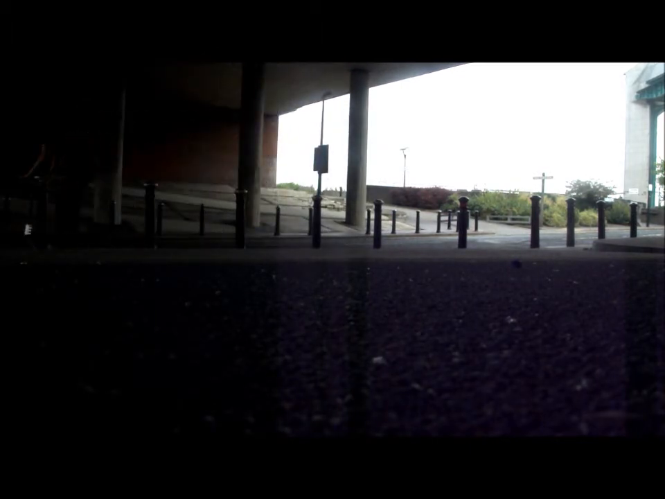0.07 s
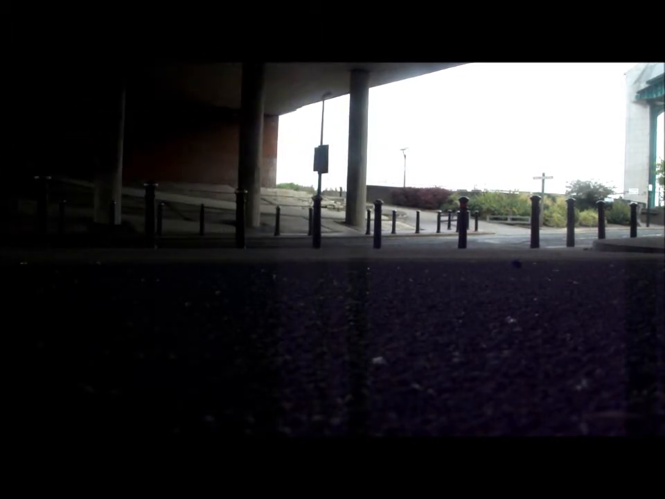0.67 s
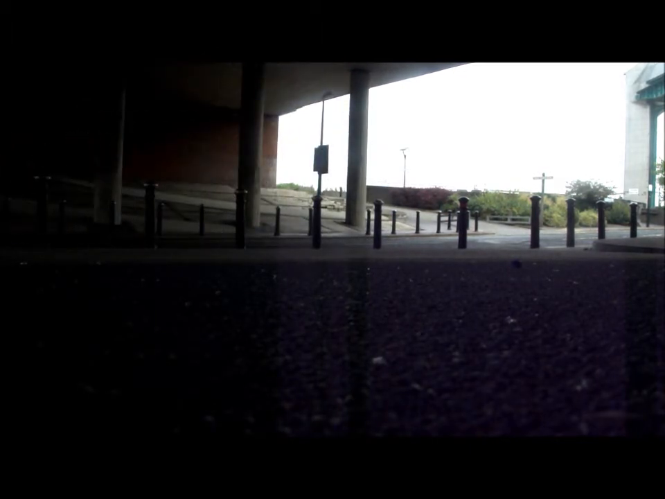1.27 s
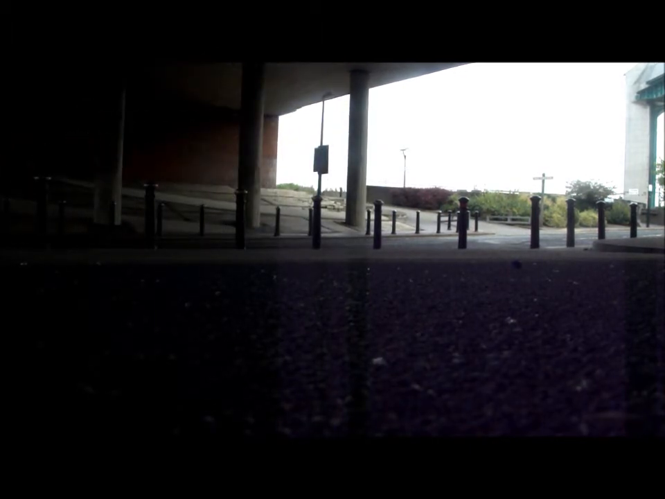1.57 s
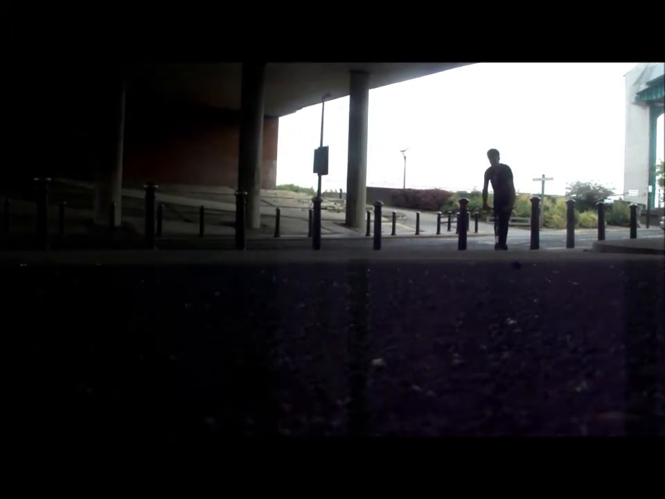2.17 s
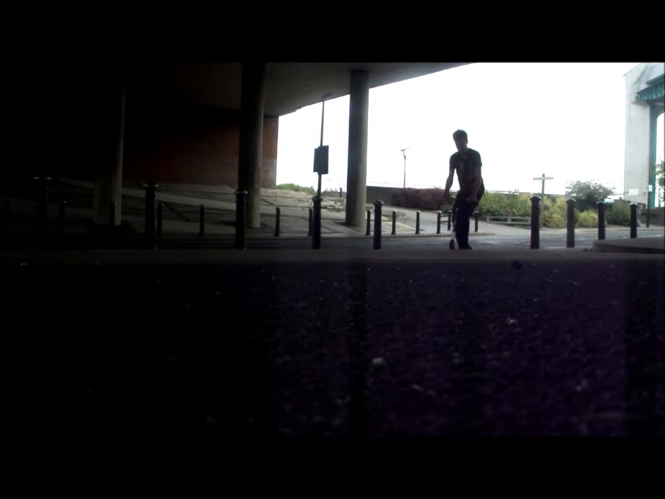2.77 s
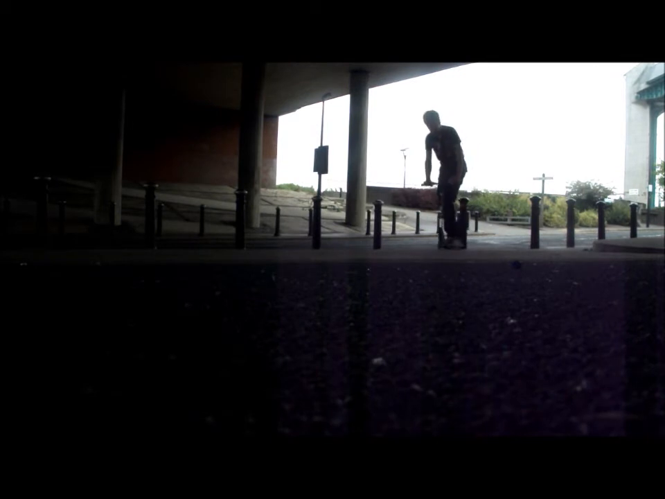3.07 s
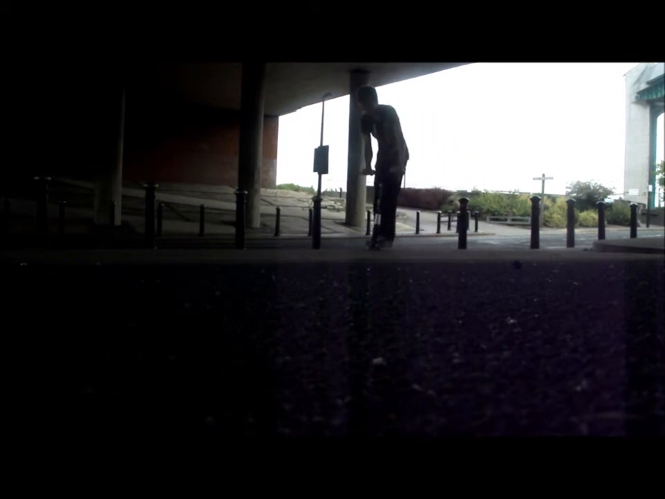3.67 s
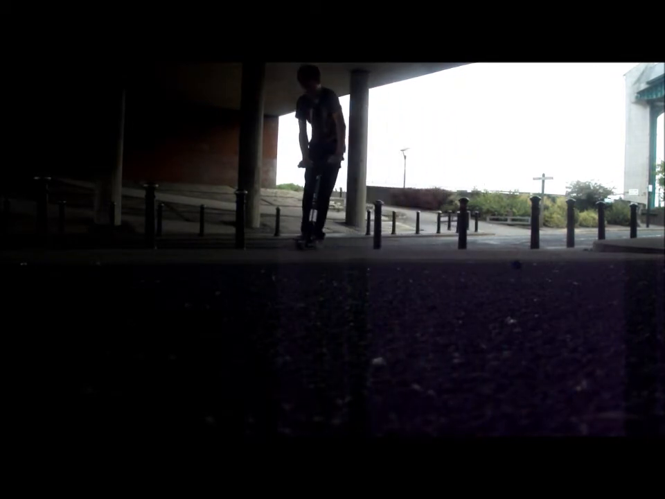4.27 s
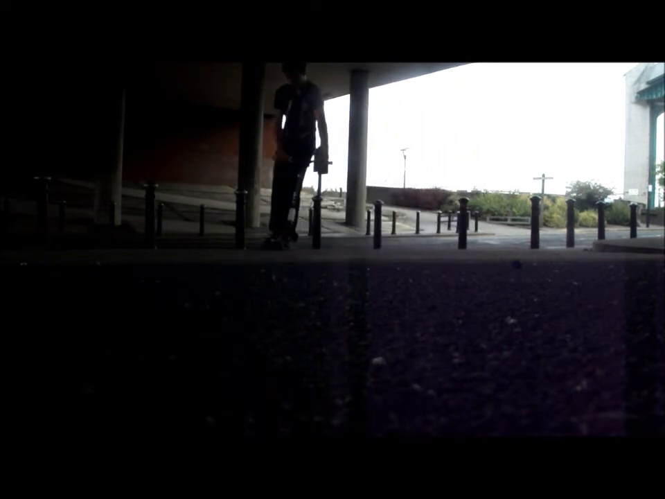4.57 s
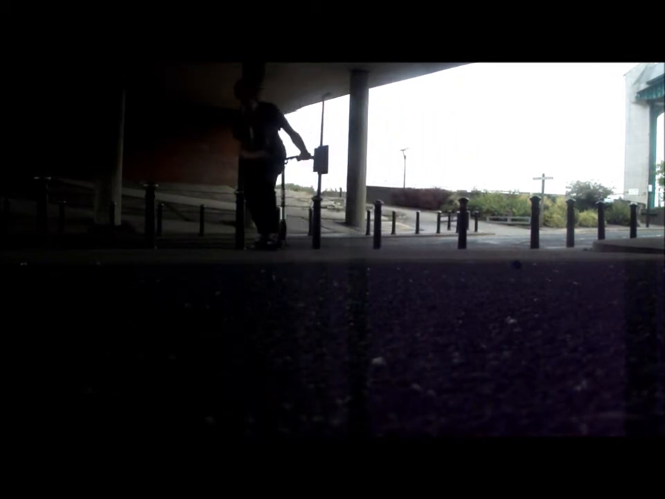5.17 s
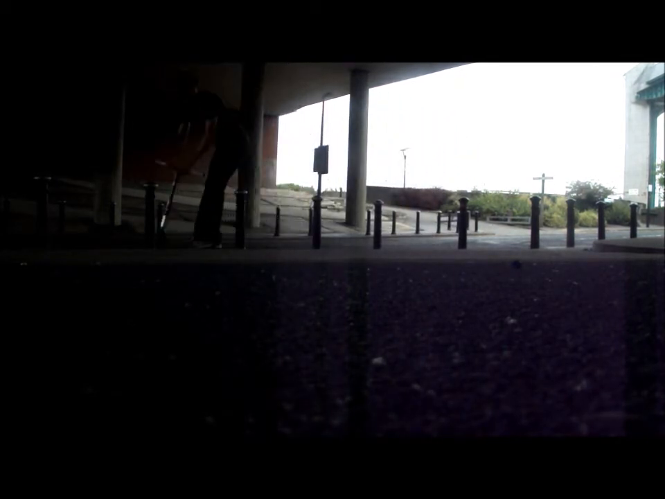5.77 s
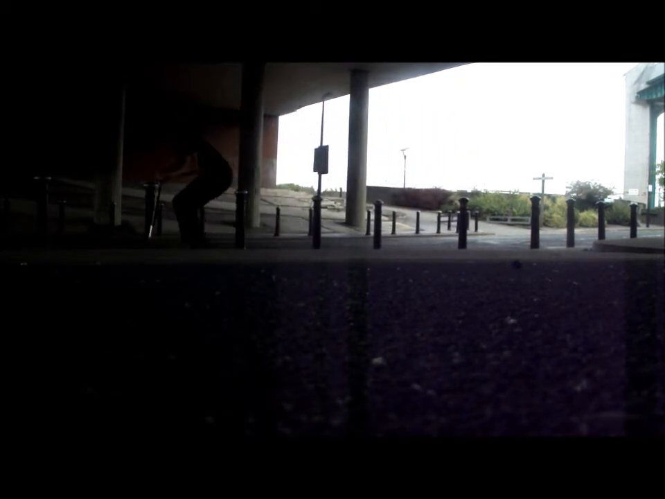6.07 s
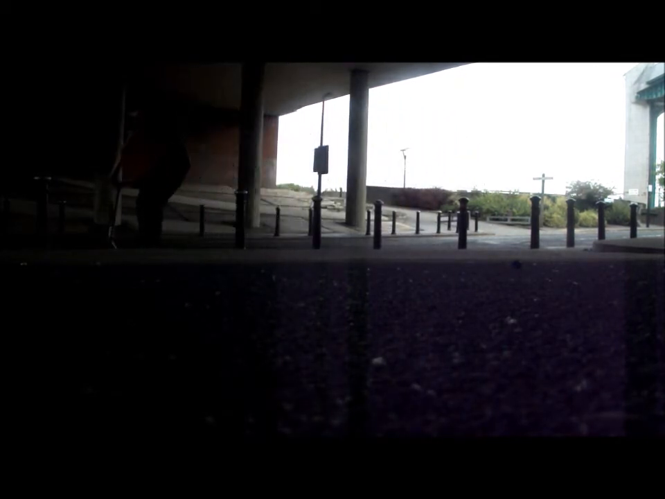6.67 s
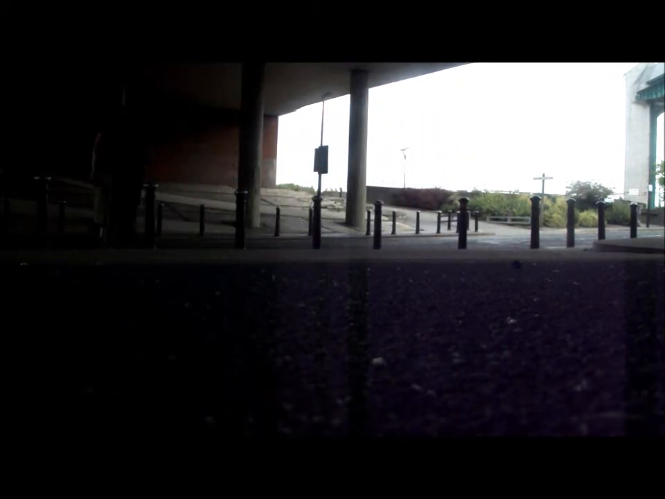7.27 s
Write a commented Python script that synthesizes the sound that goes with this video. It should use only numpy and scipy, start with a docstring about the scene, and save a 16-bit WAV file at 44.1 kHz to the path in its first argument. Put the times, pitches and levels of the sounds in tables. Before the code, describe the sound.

Under a concrete flyover, traffic rumbles steadily overhead. A stunt scooter knocks on the road a few times, its loose parts rattling and each hit echoing. After a sharp, ringing metal landing, its hard wheels roll over gritty asphalt past a microphone on the ground. The sound cuts out briefly, then returns on the hollow tail of another landing and quieter rolling.

```python
"""Traffic rumbles on a concrete flyover, and a stunt scooter knocks on the road underneath.
Its landings ring the metal frame and bounce between road and ceiling. Loose parts rattle,
and the hard wheels drum on the asphalt, skid and flick grit as they pass a small camera on the ground.
The microphone favours some pitches, the recorder whines faintly, and there is a faint hiss.
The sound cuts out twice: one tiny break, then a longer silence."""
import sys
import numpy as np
from scipy import signal
from scipy.fft import rfft, irfft
from scipy.io import wavfile
from scipy.ndimage import uniform_filter1d, minimum_filter1d

SR = 44100
rng = np.random.default_rng(int(sys.argv[2]) if len(sys.argv) > 2 else 0)


def inscribe(sig):
    """Save sig as 16-bit PCM at rate SR to the path in sys.argv[1].

    A 1-D sig is mono; a 2-D sig holds one channel per row.
    Samples are clipped to [-1, 1] before scaling.
    """
    pcm = np.round(np.clip(np.atleast_2d(sig).T, -1, 1) * 32767)
    wavfile.write(sys.argv[1], SR, pcm.astype(np.int16))


N = 331279
T = np.arange(N) / SR

# Levels in the tables are relative: the functions set how loud each layer ends up.
# wheels and deck (the footboard) hitting the road; ring and echo are added to the level:
# (time [s], level [dB], metal ring [dB], hollow note [Hz], ceiling echo [dB])
ROAD_HITS = [(.448, -2, -25, 360, 2), (.457, -1.5, -25.5, 400, -6.5), (.462, 0.5, -28, 370, -23),
             (1.111, 6, -10.5, 500, 0), (1.124, -2.5, -12.5, 500, -10.5), (2.784, -13, -1, 300, -7),
             (3.019, -6, 9, 320, -13), (3.033, -5, 5, 320, -2), (3.056, -9.5, -1, 320, -15.5),
             (3.201, 0.5, -4, 330, -5), (6.12, 3.5, -10.5, 493, -28), (6.149, 2, -7, 700, -31)]
# the tone of such a hit: (pitch [Hz], level [dB])
THUD_TONE = [(80, -22), (330, 0.5), (490, 10), (750, 0.5), (1100, 8), (1500, -1), (2300, 1), (3200, -4),
             (4000, -10), (5200, -7.5), (15000, -18)]
# the pitches at which deck and handlebars ring: (pitch [Hz], width [Hz], level [dB])
FRAME_RINGS = [(325, 27, 2.5), (512, 31, -11.5), (720, 80, -17.5), (1310, 310, -5), (1480, 120, -1),
               (1864, 110, -6), (2070, 130, -12), (2647, 84, -4), (2846, 100, -2.5), (3080, 210, -7.5),
               (3620, 450, 2), (3970, 250, -3)]
# metal parts slapping together: (time [s], level [dB], fade time [s], ceiling echo [dB])
METAL_SLAPS = [(1.233, -12.5, .012, -22), (1.244, -11.5, .007, -5.5), (1.27, -9.5, .012, -10.5),
               (1.412, -17.5, .009, -25), (1.445, -10.5, 0.005, -3.5), (2.28, -15.5, .006, -2.5),
               (3.04, -9.5, .006, -1), (3.073, -7, .008, -1), (3.087, -8, .014, -4.5),
               (3.354, -12, 0.029, -4), (6.298, -18, .016, -3)]
# heavy landings shake the frame and make the underpass boom: (time [s], shake [dB], boom [dB])
HEAVY_LANDINGS = [(1.22, -18.5, -21.5), (3.027, -6, -36), (6.15, -17.5, -19.5)]
# the tone of that boom: (pitch [Hz], level [dB])
HOLLOW_TONE = [(50, -14.5), (110, 0.5), (160, -1), (300, -10.5), (450, -13.5), (1000, -31.5), (4000, -70)]
# short dry clacks: (time [s], level [dB], ring pitch [Hz], time to fade 60 dB [s], extra click [dB])
DRY_CLACKS = [(1.111, -5.5, 3960, 0.095, -18), (1.339, -9, 1440, 0.045, 22), (2.2468, 3.5, 1730, 0.021, 19),
              (2.54, -11, 3260, .018, -5), (2.806, -10, 3240, .016, 1), (3.0211, 30, 5200, 0.01, -1),
              (3.035, 14, 5340, .006, -9), (3.088, 0.5, 2216, .029, 10.5), (5.1645, -7, 1094, 0.043, 4),
              (5.19, -7, 1090, 0.014, -3), (5.24, -10.5, 3940, .021, 1), (6.31, -12.5, 3610, .07, -10),
              (6.335, -19, 3060, 0.1, -12)]
# how loudly the wheels roll: (time [s], level [dB])
ROLL_LEVEL = [(0, -33), (1.3, -29.5), (1.7, -38), (2.07, -32), (2.085, -21.5), (2.95, -23.5), (4.2, -20),
              (5.1, -27.5), (6.6, -30.5), (7.51, -32.5)]
# the tone of wheels on asphalt: (pitch [Hz], level [dB])
WHEEL_TONE = [(80, -17), (160, -10), (260, 0), (500, -12), (800, -1.5), (1080, 2), (1450, -6),
              (2200, -11.5), (4000, -12.5), (15000, -16)]
# wheels sliding sideways on grit: (peak time [s], level [dB], rise time [s], fade speed [dB/s])
WHEEL_SKIDS = [(1.2, -36, 0.078, 49), (3.045, -26, 0.009, 38), (4.1, -47.5, 0.36, 18.5),
               (4.54, -31.5, 0.082, 230), (6.17, -35, .02, 44)]
# the tone of crushed sand: (pitch [Hz], level [dB])
SAND_TONE = [(1000, -28), (4000, -5), (7000, 7.5), (9000, 6.5), (15000, -14)]
# larger stones snapping under the wheels: (time [s], level [dB], pitch [Hz])
STONE_SNAPS = [(2.2318, -19, 8200), (2.244, -6, 8600), (3.0884, 0, 7500), (3.5992, -15, 7700),
               (3.9759, -14, 8400), (4.0277, -16, 8600), (4.0976, -17, 8760), (4.2847, -13, 9000),
               (4.479, -16, 8000), (4.5124, -15, 8290), (5.239, -13, 7900), (7.1464, -25.5, 7200)]
# the tone of the traffic's roar: (pitch [Hz], level [dB])
ROAR_TONE = [(40, -21.5), (75, 3.5), (115, -4), (150, -3), (200, -2.5), (310, -4.5), (430, -9), (570, -8.5),
             (760, -8), (1100, -11), (1450, -19), (2100, -21), (4000, -20), (15000, -15.5)]
# the tone of its deep rumble: (pitch [Hz], level [dB])
RUMBLE_TONE = [(10, -7.5), (22, -4), (38, 1.5), (50, -10), (75, -15), (115, -10.5), (170, -18), (400, -70)]
# how loud that rumble is: (time [s], level [dB])
RUMBLE_LEVEL = [(0, -14.5), (1.4, -24.5), (2.2, -22), (3.6, -32), (5.0, -25.5), (5.35, -28.5),
                (6.45, -24.5), (6.85, -16.5), (7.15, -25), (7.51, -24)]
# how loud the traffic's boom is: (time [s], level [dB])
BOOM_LEVEL = [(0, -13.5), (.9, -18.5), (1.3, -25), (1.6, -15), (1.95, -22.5), (2.5, -18.5), (3.55, -27),
              (3.9, -21.5), (4.65, -29.5), (5.25, -18), (6.5, -23), (7.4, -21)]
# how strongly the microphone picks up each pitch: (pitch [Hz], gain [dB])
MIC_TONE = [(1000, 2.5), (2300, 4), (2700, 5), (3020, 8), (3500, -7), (4150, -14), (4700, -18.5),
            (5700, -21.5), (6600, -17.5), (7600, -12), (9000, -20), (11000, -24.5), (15000, -23.5)]
# the tone of the hiss that both channels share: (pitch [Hz], level [dB])
HISS_TONE = [(100, 0.23), (4000, 0.15), (8000, 0.17), (11000, 1), (15000, 2)]
# moments when the sound cuts out: (start [s], end [s], gain [dB])
SOUND_GAPS = [(2.076, 2.085, -20), (5.588, 6.189, -140)]

LANDING_RISE_S, SHAKE_FALL_DB_PER_S, BOOM_FALL_DB_PER_S = .012, 15, 11
KNOCK_ECHO_S, ECHO_STEP_S = .0405, .032  # wait for a knock's first echo; time between echoes


def knocks(crunch_db=-8, thud_db=9, ring_db=20, note_db=-20, note_fade_s=.27, crack_db=-14, crack_s=.0012):
    """Hitting the road makes a thud, a metal ring and a hollow note. Returns (direct, sent upward)."""
    blows, frame_push, note, upward = np.zeros((4, N))
    t = T[:12000]
    crunch_fade = np.exp(-(t / .003) ** 2) + .3 * np.exp(-t / .009)
    for s, db, metal_db, hz, echo_db in ROAD_HITS:
        force = undb(crunch_db) * np.sign(noise(len(t))) * crunch_fade / 2
        force[0] += 1  # the sharp first contact
        crack = undb(db + crack_db) * unit(band(noise(len(t)), 9000, 7000)) * np.exp(-t / crack_s)
        add(blows, s, undb(db) * (force + crack))  # db counts twice in the crack: hard hits crack more
        add(upward, s, undb(db + echo_db) * (force + crack))
        add(frame_push, s, undb(db + metal_db) * force)
        add(note, s, undb(db + note_db - 60 * t / note_fade_s) * np.sin(2 * np.pi * hz * t))
    thud, upward = (undb(thud_db) * colour(x, THUD_TONE) for x in (blows, upward))
    return thud + undb(ring_db) * frame_ring(frame_push) + note, upward


def frame_ring(force):
    """Struck metal rings at its own set of pitches."""
    return sum(undb(db) * band(force, hz, width) for hz, width, db in FRAME_RINGS)


def slaps(hz=2600, ring_db=-2, gain_db=8, lowest_hz=1900):
    """Metal chatters on metal, stirring only the high rings. Returns (direct, sent upward)."""
    force, t = np.zeros((2, N)), T[:8192]
    for s, db, fade_s, echo_db in METAL_SLAPS:
        burst = undb(db) * np.exp(-(t / fade_s) ** 2)
        add(force[0], s, burst)
        add(force[1], s, undb(echo_db) * burst)
    chatter = keep_side(force * grains(rate=6000, spread_db=3), "high", lowest_hz, order=3)
    return undb(gain_db) * (band(chatter, hz, hz / 2) + undb(ring_db) * frame_ring(chatter))


def rattle(clatter_db=-15, gain_db=-6, uneven_db=2.5, roll_db=-6.5, skid_db=10):
    """Loose parts tap the frame: hard after a landing or in a skid, lightly while rolling."""
    jolts = [surge(s, db, LANDING_RISE_S, SHAKE_FALL_DB_PER_S) for s, db, _ in HEAVY_LANDINGS]
    shake = together(jolts + [undb(curve(ROLL_LEVEL) + roll_db), undb(skid_db) * sliding()])
    taps = grains(rate=2000, spread_db=1) * undb(uneven_db * wander(90))
    clatter = undb(clatter_db) * band(taps, 2504, 2800)
    return shake * undb(gain_db) * unit(frame_ring(taps) + clatter)


def clacks(click_s=.00152, click_db=-4, rough_db=-5):
    """Each clack is a click with one rough ring that dies quickly."""
    out, t = np.zeros(N), T[:4096]
    for s, db, hz, fade_s, extra_db in DRY_CLACKS:
        ring = np.sin(2 * np.pi * hz * t) + undb(rough_db) * unit(band(noise(len(t)), hz, hz / 3))
        click = undb(extra_db + click_db) * noise(len(t)) * np.exp(-t / click_s)
        add(out, s, undb(db) * (ring * undb(-60 * t / fade_s) + click))
    return out


def wheels(gain_db=1):
    """Hard wheels drum over the stones in the asphalt."""
    level_db = curve(ROLL_LEVEL) + gain_db + wander(25)
    bumps = grains(rate=4000, spread_db=3)
    return undb(level_db) * unit(colour(bumps, WHEEL_TONE))


def skids(gain_db=19, roll_db=-35.5):
    """Wheels crush sand in uneven bursts: loudly when sliding, softly when rolling."""
    strength = together([sliding(), undb(curve(ROLL_LEVEL) + roll_db)])
    sand = grains(rate=1400, spread_db=4) * undb(2.5 * wander(120))
    return strength * undb(gain_db) * unit(colour(sand, SAND_TONE))


def sliding():
    """How hard the wheels slide sideways at each moment."""
    return together([surge(*skid) for skid in WHEEL_SKIDS])


def grit(snap_s=.004, width_hz=3000, gain_db=14, stray_hz=8000, stray_db=-25):
    """Single stones snap under the wheels; smaller ones pop at random."""
    snaps = np.zeros(N)
    fade = np.exp(-T[:2048] / snap_s)
    ring = lambda x, hz: band(band(x, hz, width_hz), hz, width_hz)
    for s, db, hz in STONE_SNAPS:
        snap = ring(noise(len(fade)) * fade, hz)
        add(snaps, s, undb(db + gain_db) * snap / np.abs(snap).max())
    pop_fades = signal.fftconvolve(grains(rate=12, spread_db=4.5), fade)[:N]
    pops = unit(ring(pop_fades * noise(), stray_hz))
    return snaps + undb(curve(ROLL_LEVEL) + stray_db + gain_db) * pops


def ceiling_echoes(x, first_s, first_db, step_db, count):
    """Sound bounces between road and ceiling, weaker on every trip."""
    out = np.zeros(N)
    for trip in range(count):
        add(out, first_s + trip * ECHO_STEP_S, undb(first_db + trip * step_db) * x)
    return out


def underpass(x, low_fade_s=4.1, high_fade_s=.79, split_hz=4500, build_s=.0097):
    """Bare concrete blurs many echoes into one long tail; the high pitches die first."""
    scatter = noise()
    low = keep_side(scatter, "low", split_hz) * undb(-60 * T / low_fade_s)
    high = keep_side(scatter, "high", split_hz) * undb(-60 * T / high_fade_s)
    tail = (low - high) * (1 - np.exp(-T / build_s))
    return signal.fftconvolve(x, tail / np.linalg.norm(tail))[:N]


def landing_boom():
    """A hollow boom hangs under the flyover after each heavy landing."""
    swell = together([surge(s, db, LANDING_RISE_S, BOOM_FALL_DB_PER_S) for s, _, db in HEAVY_LANDINGS])
    return swell * unit(colour(noise(), HOLLOW_TONE))


def traffic(roar_db=-20, boom_db=-1, boom_hz=60.14, drift_hz=2.482, width_hz=14, waver=.7):
    """Traffic overhead makes a nearly steady roar, a deep rumble and a wavering boom."""
    roar = undb(roar_db + .6 * wander(6)) * unit(colour(noise(), ROAR_TONE))
    rumble = undb(curve(RUMBLE_LEVEL)) * unit(colour(noise(), RUMBLE_TONE))
    pitch_hz = boom_hz + drift_hz * wander(6)
    drone = np.sqrt(2) * np.sin(2 * np.pi * np.cumsum(pitch_hz) / SR)
    boom = unit(drone + waver * unit(band(noise(), boom_hz, width_hz)))
    return roar + rumble + undb(curve(BOOM_LEVEL) + boom_db) * boom


def limiter(x, threshold=1.15, window=90):
    """Turn the loudest peaks down quickly and cut off whatever is still too big."""
    gain = minimum_filter1d(threshold / np.maximum(np.abs(x), threshold), size=window)
    return np.clip(x * uniform_filter1d(gain, size=window), -.98, .98)


def undb(db):
    """Turn decibels into a gain, a number to multiply by."""
    return 10 ** (np.asarray(db) / 20)


def unit(x):
    """Scale a signal so its typical swing (standard deviation) is 1."""
    return x / np.std(x)


def curve(rows):
    """Join (time, value) points with straight lines."""
    return np.interp(T, *np.transpose(rows))


def surge(s, db, rise_s, fall_db_per_s):
    """A gain that swells to its peak at time s, then dies away."""
    return undb(db - fall_db_per_s * np.maximum(T - s, 0)) * np.exp(np.minimum(T - s, 0) / rise_s)


def together(gains):
    """The combined gain of unrelated sounds: their powers add up."""
    return np.linalg.norm(gains, axis=0)


def noise(size=N):
    """White noise, an even hiss."""
    return rng.standard_normal(size)


def wander(rate):
    """Glide to a new random value `rate` times a second."""
    return unit(np.interp(T * rate, np.arange(1024), noise(1024)))


def grains(rate, spread_db):
    """Tiny random taps of unequal size, about `rate` a second."""
    taps = (rng.random(N) < rate / SR) * np.sign(noise())
    return unit(taps * undb(spread_db * np.clip(noise(), -2, 2)))


def add(track, s, sound):
    """Mix a sound in at time s."""
    start = int(s * SR)
    track[start:start + len(sound)] += sound[:N - start]


def band(x, hz, width):
    """Keep the pitches around hz, like something that rings there."""
    return signal.lfilter(*signal.iirpeak(min(hz, SR / 2 - 1), hz / width, fs=SR), x)


def keep_side(x, side, hz, order=2):
    """Keep the pitches on the "low" or "high" side of hz."""
    return signal.sosfilt(signal.butter(order, hz, side, fs=SR, output="sos"), x)


def colour(x, tone, size=8192):
    """Make each pitch louder or softer, following a tone table."""
    hz, db = np.transpose(tone)
    bins = np.maximum(np.fft.rfftfreq(size, 1 / SR), 1)
    gains = undb(np.interp(np.log(bins), np.log(hz), db))
    # fold the filter so that it rings only after a hit, never before
    cepstrum = irfft(np.log(gains))
    cepstrum[1:size // 2] *= 2
    cepstrum[size // 2 + 1:] = 0
    return signal.fftconvolve(x, irfft(np.exp(rfft(cepstrum))))[:len(x)]


def scene():
    """Scooter, echoes and traffic meet at one microphone on the ground."""
    hits, hits_up = knocks()
    metal, metal_up = slaps()
    hits_up = keep_side(hits_up, "high", 600, order=1)  # the ribbed ceiling returns little bass
    echoes = ceiling_echoes(hits_up, KNOCK_ECHO_S, first_db=.5, step_db=-4.5, count=3)
    echoes += ceiling_echoes(metal_up, ECHO_STEP_S, first_db=-1, step_db=-2.5, count=9)
    space = echoes + underpass(undb(-5.5) * hits + undb(-6) * metal) + landing_boom()
    scooter = hits + metal + rattle() + clacks() + grit() + skids() + wheels()
    air = scooter + space + traffic()
    return np.array([air, air])


def record(dry, shared_hiss_db=-50, channel_hiss_db=-47, whine_hz=7440, drift_hz=5,
           whine_db=-47, octave_db=-48, mono_hz=260, top_hz=15300):
    """An uneven microphone, a limiter, a faint hiss and whine; the sound cuts out twice."""
    sound = np.array([limiter(colour(x, MIC_TONE)) for x in dry])
    hiss = undb(shared_hiss_db) * unit(colour(noise(), HISS_TONE))
    hiss = hiss + undb(channel_hiss_db) * noise(dry.shape)  # slightly different in each channel
    phase = 2 * np.pi * np.cumsum(whine_hz + drift_hz * wander(40)) / SR
    whine = undb(whine_db) * np.sin(phase) + undb(octave_db) * np.sin(2 * phase)
    left, right = sound + hiss + whine
    # above the bass, the left channel is one sample late
    left = np.append(0, left[:-1])
    bass_cut = signal.butter(1, mono_hz, "high", fs=SR, output="sos")
    mid, side = (left + right) / 2, signal.sosfiltfilt(bass_cut, (left - right) / 2)
    gap_gain = undb(sum(db * ((T > start) & (T < end)) for start, end, db in SOUND_GAPS))
    treble_cut = signal.ellip(10, .2, 80, top_hz, fs=SR, output="sos")
    return signal.sosfilt(treble_cut, gap_gain * np.array([mid + side, mid - side]))


dry = scene()
out = record(dry)
inscribe(out)
```